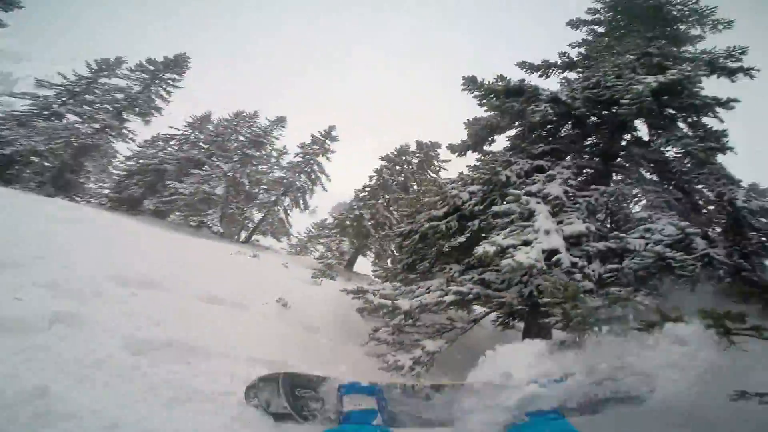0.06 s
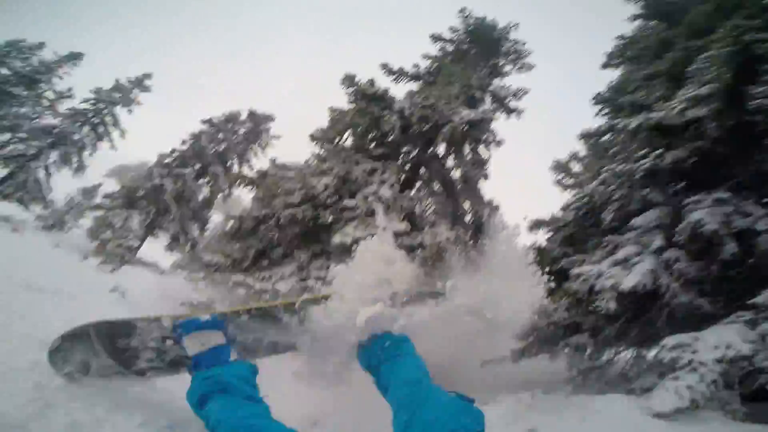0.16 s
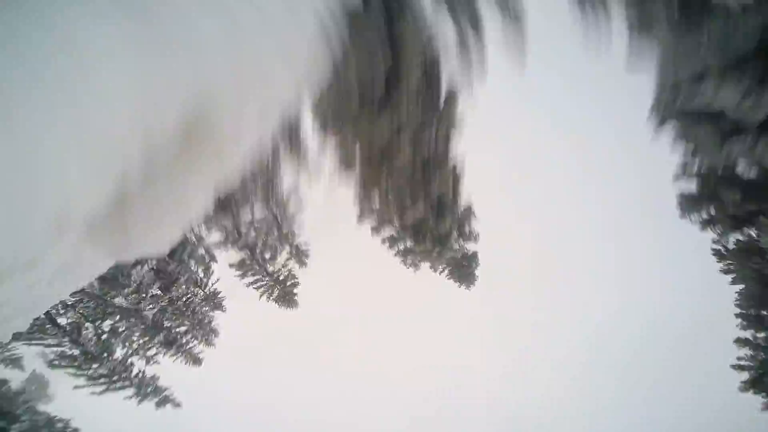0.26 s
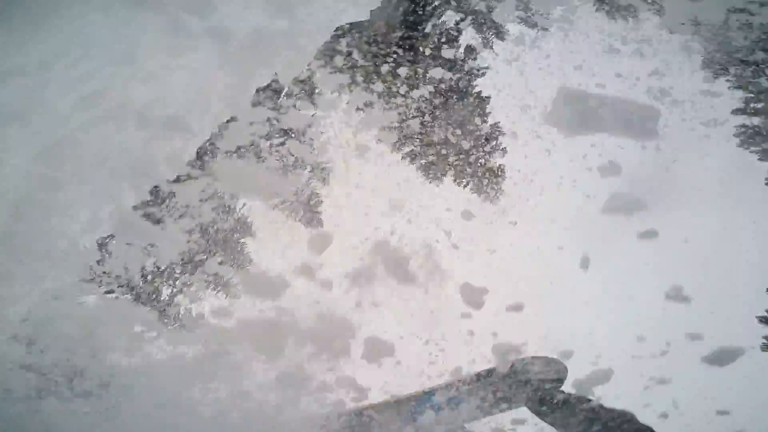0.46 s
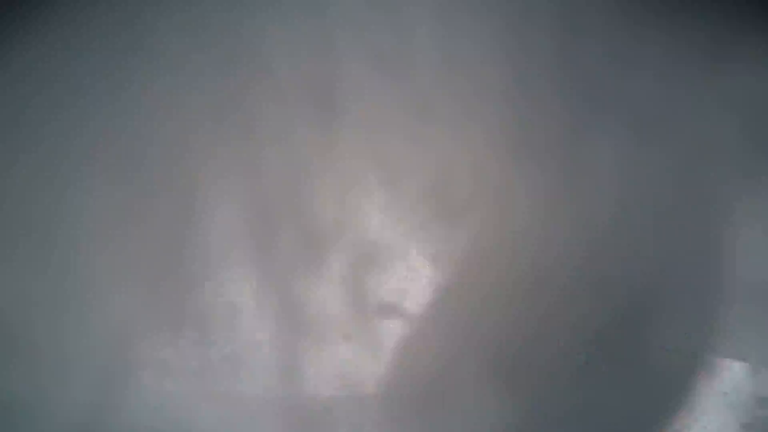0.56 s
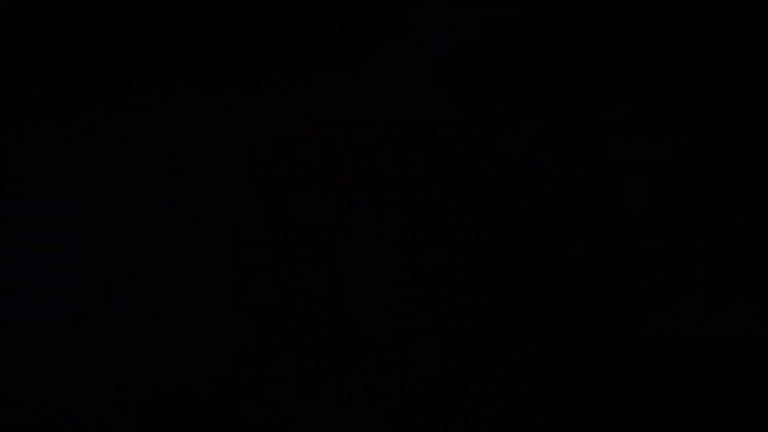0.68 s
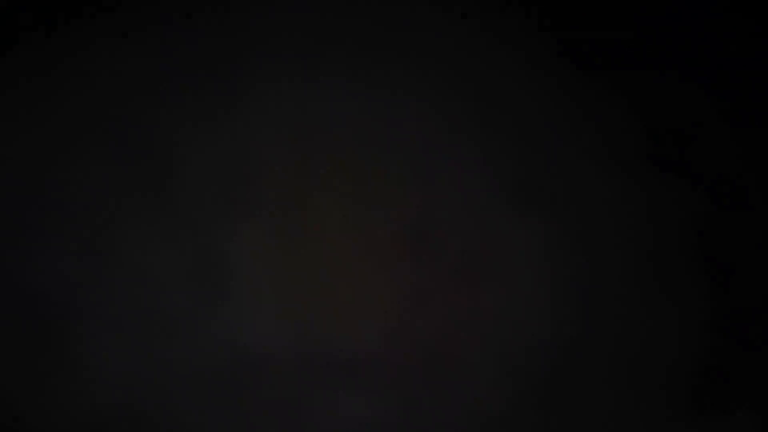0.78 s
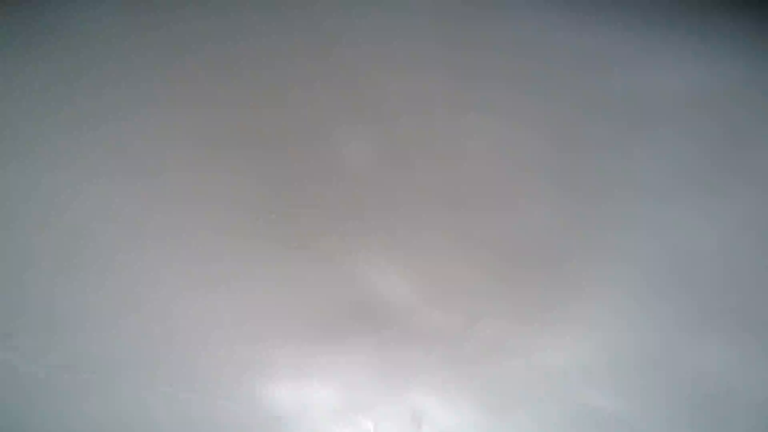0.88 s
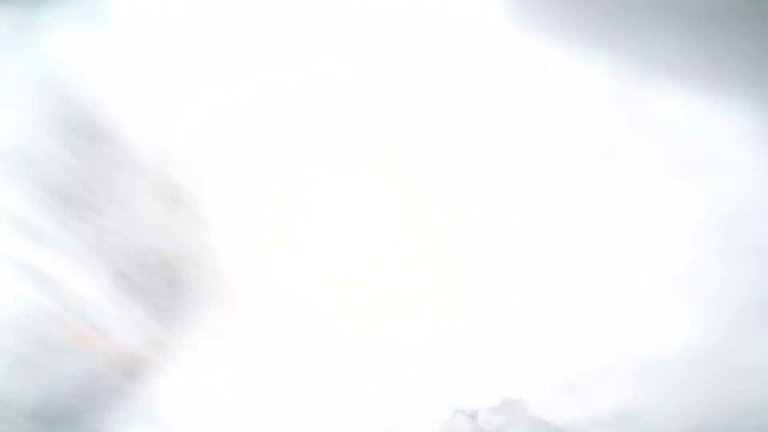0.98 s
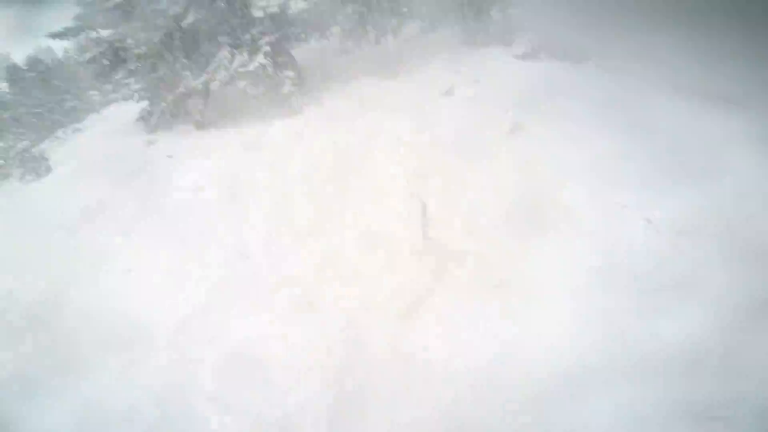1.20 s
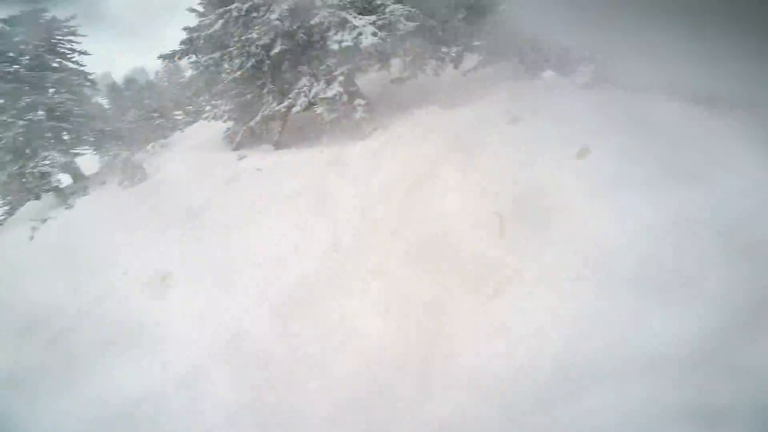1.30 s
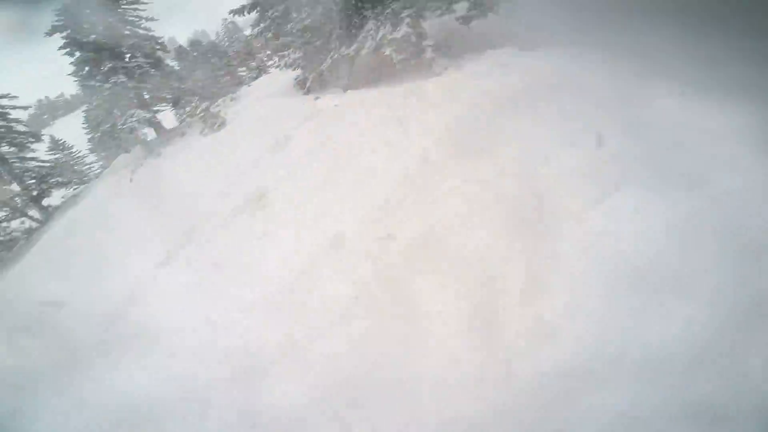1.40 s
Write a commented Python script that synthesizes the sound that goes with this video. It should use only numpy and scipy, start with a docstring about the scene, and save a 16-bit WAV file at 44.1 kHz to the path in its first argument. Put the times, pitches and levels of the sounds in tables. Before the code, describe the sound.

A snowboarder crashes through snow, heard right on a body-worn camera. Faint board hiss, ticks and low wind rumble lead to hard knocks and a thud around 0.35 seconds. From 0.5 to 0.9 seconds snow sprays, crunches and scrapes loudly over the housing, with more knocks. Near 1 second come a bump, plastic clacks and a brief low shudder, then light crackles of falling clumps fade by 1.4 seconds.

```python
"""Wind rumbles and snow flicks the plastic housing of a body-worn camera as a rider crashes in powder.
The board hisses by sliding friction, loose gear clacks, and a hard landing knocks and thuds on the shell.
Snow crunches as it fractures, sprays over the housing and scrapes along it by stick and slip.
After a last bump the mount shudders in its damped modes and a few loose clumps patter down."""
import sys
import numpy as np
from scipy.fft import rfft, irfft, next_fast_len
from scipy.io import wavfile
from scipy.ndimage import map_coordinates

SR = 44100
rng = np.random.default_rng(int(sys.argv[2]) if len(sys.argv) > 2 else 0)


def generate_wav(signal):
    """Clip the signal to [-1, 1] and save it as 16-bit WAV at the path in sys.argv[1]."""
    frames = np.transpose(np.atleast_2d(signal))
    scaled = np.clip(frames, -1, 1) * 32767
    pcm = np.round(scaled).astype(np.int16)
    wavfile.write(sys.argv[1], SR, pcm)


N = 63945


def amp(db):
    """Decibels to amplitude gain."""
    return 10 ** (np.asarray(db) / 20)


def unit(x):
    """Normalisation to rms 1."""
    return x / np.sqrt(np.mean(x ** 2) + 1e-20)


def unit_power(response):
    """Normalisation to a mean power gain of 1."""
    return response / np.sqrt(np.mean(np.abs(response) ** 2))


def clock():
    """Time of every sample in seconds."""
    return np.arange(N) / SR


def level(points):
    """Gain envelope interpolated through (s, dB) points."""
    return amp(np.interp(clock(), *np.transpose(points)))


def swell(peak_s, rise_s, fall_s):
    """Exponential growth to a peak, then exponential decay."""
    t = clock() - peak_s
    return np.exp(np.minimum(t / rise_s, -t / fall_s))


def filtered(x, response):
    """Linear filtering: the spectrum of x times a complex frequency response."""
    size = 2 * next_fast_len(N // 2 + 4096)
    hz = np.fft.rfftfreq(size, 1 / SR)
    return irfft(rfft(x, size) * response(hz), size)[:N]


def colour(points, hz, tilt_db=0, tilt_from_hz=3200):
    """Minimum-phase response of unit power through (Hz, dB) points, its treble tilted per octave."""
    point_hz, point_db = np.transpose(points)
    octave = np.log2(np.clip(hz, point_hz[0], point_hz[-1]))
    tilt = tilt_db * np.maximum(octave - np.log2(tilt_from_hz), 0)
    gain = amp(np.interp(octave, np.log2(point_hz), point_db) + tilt)
    cepstrum = irfft(np.log(gain))
    half = len(cepstrum) // 2
    cepstrum[1:half] *= 2  # folding onto positive time makes the response causal
    cepstrum[half + 1:] = 0
    return unit_power(np.exp(rfft(cepstrum)))


def resonances(modes, hz):
    """Superposition of second-order band-pass resonators given as (Hz, width Hz, dB)."""
    return sum(amp(db) * 1j * hz * width / (centre ** 2 - hz ** 2 + 1j * hz * width)
               for centre, width, db in modes)


def ringing(modes, start_s, rise_s):
    """Free vibration: damped sinusoids given as (Hz, dB, seconds to fall 60 dB)."""
    t = np.maximum(clock() - start_s, 0)
    onset = 1 - np.exp(-t / rise_s)
    return onset * sum(amp(db - 60 * t / t60) * np.sin(2 * np.pi * hz * t) for hz, db, t60 in modes)


def grains(per_s, bed_db):
    """Shot noise of snow grains on a bed of white noise, rms 1."""
    struck = rng.random(N) < per_s / SR
    impulses = unit(struck * rng.standard_normal(N))
    return unit(impulses + amp(bed_db) * rng.standard_normal(N))


def fits(per_s=450, swing_db=3.5):
    """Random amplitude modulation, rms 1, of snow that holds and gives way."""
    knots = np.clip(rng.standard_normal(int(N * per_s / SR) + 4), -1.5, 1.5)
    return unit(amp(swing_db * map_coordinates(knots, [clock() * per_s])))


def burst(peak_s, decay_s, snap_db=4):
    """A rough contact: one impulse, then decaying noise of fine crumbling."""
    snap = amp(snap_db) * (np.arange(N) == round(peak_s * SR))
    return snap + swell(peak_s, rise_s=0.00035, fall_s=decay_s) * rng.standard_normal(N)


# Strength of the wind. Each row: time in seconds, level in dB.
WIND_LEVELS = [(0, -41), (.14, -41), (.22, -32.5), (.3, -28), (.38, -19.5), (.41, -48), (.48, -37.5),
               (.55, -30), (.68, -23.5), (.83, -30), (.9, -41), (1.1, -41.5), (1.2, -50.5), (1.45, -44.5)]
# Spectrum of the wind. Each row: frequency in Hz, relative level in dB.
WIND_SPECTRUM = [(15, -9), (35, 0), (60, 1), (100, -13.5), (170, -22), (300, -36.5), (800, -37),
                 (3000, -110)]


def wind():
    """Turbulence: pressure fluctuations buffet the housing with a low rumble."""
    rumble = filtered(rng.standard_normal(N), lambda hz: colour(WIND_SPECTRUM, hz))
    return level(WIND_LEVELS) * unit(rumble)


# Strength of the housing's scrape through snow. Each row: time in seconds, level in dB.
PLOUGH_LEVELS = [(0, -58.5), (.21, -75), (.24, -41), (.29, -53), (.41, -82), (.465, -74), (.495, -44),
                 (.6, -32.5), (.7, -33), (.755, -36.5), (.785, -32), (.805, -25.5), (.823, -32),
                 (.838, -16), (.875, -20), (.905, -23), (.935, -48), (1.05, -65), (1.45, -78)]
# Spectrum of packed snow. Each row: frequency in Hz, relative level in dB.
PACKED_SPECTRUM = [(60, -5), (200, 0.5), (400, 0.5), (600, -3.5), (1000, -11.5), (1800, -15), (4000, -25),
                   (8000, -38), (15000, -39.5)]


def plough():
    """Stick-slip friction: packed snow catches and releases on the housing in a dull, coarse scrape."""
    slips = level(PLOUGH_LEVELS) * grains(per_s=1500, bed_db=-9.5)
    return filtered(slips, lambda hz: colour(PACKED_SPECTRUM, hz))


# Modes of the plastic shell. Each row: frequency in Hz, bandwidth in Hz, gain in dB.
HOUSING_MODES = [(1632, 120, 6.5), (2400, 280, -9), (3306, 108, 2.5), (7440, 79, -4)]


def housing(hz, coupling_db=0):
    """Resonance: the shell adds a few narrow bands to the sound passing through it."""
    return 1 + amp(coupling_db) * resonances(HOUSING_MODES, hz)


# Strength of the board's hiss. Each row: time in seconds, level in dB.
SLIDE_LEVELS = [(0, -62.5), (.19, -56), (.235, -53.5), (.33, -47), (.365, -56), (.4, -77.5), (.452, -71),
                (.46, -66), (.482, -41), (.55, -39.5), (.6, -31), (.645, -29), (.67, -56.5), (.9, -33),
                (.94, -62), (1.0, -58), (1.06, -62), (1.2, -44.5), (1.3, -59.5), (1.45, -58)]
# Spectrum of that hiss. Each row: frequency in Hz, relative level in dB.
SLIDE_SPECTRUM = [(300, -19), (1100, -17.5), (1600, -6), (2300, -1.5), (4300, -10), (6500, -14.5),
                  (9000, -23.5), (15000, -30)]


def slide():
    """Sliding friction: the board on snow makes a smooth hiss, heard through the shell."""
    hiss = level(SLIDE_LEVELS) * rng.standard_normal(N)
    return filtered(hiss, lambda hz: colour(SLIDE_SPECTRUM, hz) * housing(hz))


# Snow clumps striking the shell. Each row: time in seconds, level in dB, decay in seconds,
# treble tilt in dB per octave.
CLUMP_HITS = [(0.0897, -34.5, 0.0024, -4), (0.1059, -37.5, 0.0035, 0), (0.1758, -38.5, 0.00055, 7),
              (0.2229, -23, 0.0019, -3), (.2815, -36, 0.0014, -1), (.324, -25, 0.0013, 0),
              (0.339, -13, 0.0015, -6.5), (0.3591, -10, 0.00081, -8.5), (0.371, -42, 0.0031, 5),
              (.388, -28.5, 0.00073, 3), (0.5698, -9.5, 0.0012, -1), (0.574, -26, 0.00057, 6),
              (0.58, -19, 0.0021, 3.5), (0.6078, -10.5, 0.0027, 6.5), (0.7929, -17, 0.00034, -2.5),
              (0.796, -16, 0.00037, 2), (0.811, -11, 0.00069, -0.5), (.839, -13.5, 0.00067, -2),
              (1.245, -22, 0.0021, 4), (1.27, -31.5, 0.0012, -1), (1.28, -35.5, 0.00096, 5),
              (1.302, -38.5, 0.00084, 4), (1.318, -39, 0.00088, 8), (1.3312, -32, 0.00077, 1.5),
              (1.34, -42, 0.00079, 2), (1.3481, -43, .0007, 14), (1.361, -36.5, 0.0012, 4),
              (1.369, -34.5, 0.00051, 0.5)]
# Spectrum of a brief contact. Each row: frequency in Hz, relative level in dB.
CONTACT_SPECTRUM = [(200, -8.5), (1050, -15), (1600, -3), (2500, -2), (4200, -4.5), (7300, -8),
                    (11000, -19.5), (15000, -25)]


def clumps():
    """Inelastic impact: each clump bursts on the shell with its own brightness."""
    hits = sum(filtered(amp(db) * burst(s, decay), lambda hz: colour(CONTACT_SPECTRUM, hz, tilt_db))
               for s, db, decay, tilt_db in CLUMP_HITS)
    return filtered(hits, lambda hz: housing(hz, coupling_db=-8))


# Loose plastic gear colliding. Each row: time in seconds, level in dB, decay in seconds, pitch ratio.
GEAR_HITS = [(0.2216, -23, 0.0034, 1.11), (0.2635, -30.5, 0.0019, 1.04), (1.0104, -17.5, 0.0022, 1.03),
             (1.0151, -17, 0.0033, 0.96), (1.037, -28.5, 0.0024, 1.12), (1.057, -24, 0.0019, 0.81),
             (1.075, -30, 0.0032, 1.05), (1.0984, -11.5, 0.001, 0.97), (1.118, -26.5, 0.0013, 0.94)]
# Modes of the gear. Each row: frequency in Hz, bandwidth in Hz, relative gain in dB.
GEAR_MODES = [(1705, 400, 0.5), (2150, 280, 3), (2440, 180, 2), (3560, 170, -13)]


def clacks():
    """Impact excitation: rough contacts ring the gear, higher or lower with the spot that is struck."""
    def ring(hz, pitch):
        return unit_power(resonances(GEAR_MODES, hz / pitch) * colour(CONTACT_SPECTRUM, hz))
    return sum(filtered(amp(db) * burst(s, decay), lambda hz: ring(hz, pitch))
               for s, db, decay, pitch in GEAR_HITS)


def leaky(pressure, corner_hz):
    """First-order high-pass: pressure on the microphone leaks away and swings back."""
    return filtered(pressure, lambda hz: 1j * hz / (corner_hz + 1j * hz))


# Soft pushes on the microphone. Each row: peak time in seconds, level in dB, half width in seconds.
SHOVE_PULSES = [(0.241, -8, 0.0041), (0.263, -12, 0.0043), (0.315, -13, 0.0034), (0.375, -12.5, 0.0017),
                (0.654, -3, 0.0026), (0.673, -9.5, 0.0022), (.966, -8, 0.0072)]


def shoves():
    """Slow compression: air and snow press on the microphone in Gaussian pulses."""
    pressure = sum(amp(db) * np.exp(-((clock() - s) / width) ** 2) for s, db, width in SHOVE_PULSES)
    return leaky(pressure, corner_hz=12.6)


# Hard blows on the housing. Each row: start in seconds, level in dB, rise time in seconds.
KNOCK_PULSES = [(0.3051, -4.5, 0.00063), (.34, -1, 0.00098), (.343, 4, 0.0003), (0.3476, 1.5, 0.00088),
                (0.353, -4, 0.00046), (0.7023, -0.5, 0.00052), (.801, -2, 0.00031), (.81, -2.5, 0.00057),
                (0.8268, -1.5, 0.00048), (0.8303, -4.5, 0.00032)]


def knocks():
    """Impulsive loading: each blow is one short push of pressure with no ring."""
    pressure = np.zeros(N)
    for start, db, rise in KNOCK_PULSES:
        age = np.maximum(clock() - start, 0) / rise
        pressure += amp(db) * (age * np.exp(1 - age)) ** 2
    return leaky(pressure, corner_hz=67.6)


# Modes of the landing thud. Each row: frequency in Hz, level in dB, seconds to fall 60 dB.
THUD_MODES = [(75, 1.4, 0.066), (184.6, 0.55, 0.044)]


def thud():
    """Heavy damping: the landing excites low, hollow modes of the camera that die quickly."""
    return ringing(THUD_MODES, start_s=0.3405, rise_s=0.0017)


# Snow collapsing under the housing. Each row: peak time in seconds, level in dB, rise in seconds,
# fall in seconds, level of the dull body relative to the crisp grains in dB.
COLLAPSES = [(0.353, -22.5, 0.005, 0.0025, 11.5), (0.427, -57.5, 0.0012, 0.0091, 18),
             (0.652, -21, 0.0035, 0.00059, 3.5), (0.663, -17, 0.001, 0.0026, 5.5),
             (0.672, -15, 0.0023, 0.004, -10.5), (0.69, -16.5, 0.0025, 0.0048, -3),
             (.7, -15.5, 0.0056, 0.0061, -2), (0.7237, -19, 0.0029, 0.003, 6.5),
             (0.7412, -17.5, 0.0073, 0.0021, 6.5), (0.761, -21, 0.00081, 0.0061, 0),
             (0.7675, -20.5, 0.0032, 0.0021, 8.5), (0.8125, -20.5, 0.0017, 0.0036, 14),
             (0.966, -16.5, 0.0053, 0.0036, -2), (1.014, -23.5, 0.0046, 0.0051, -10)]
# Spectrum of the crisp grains. Each row: frequency in Hz, relative level in dB.
CRISP_SPECTRUM = [(200, 0), (900, -2.5), (1500, 3), (2600, -2), (4500, -6.5), (7500, -9.5), (11000, -15),
                  (15000, -25)]


def crunches():
    """Brittle fracture: snow under growing load lets go in fits, bright grains over a duller body."""
    crisp_gain = sum(amp(db) * swell(s, rise, fall) for s, db, rise, fall, _ in COLLAPSES)
    body_gain = sum(amp(db + body_db) * swell(s, rise, fall) for s, db, rise, fall, body_db in COLLAPSES)
    breaking = fits()
    crisp = breaking * crisp_gain * grains(per_s=3000, bed_db=1.5)
    body = breaking * body_gain * grains(per_s=3000, bed_db=2.0)
    return (filtered(crisp, lambda hz: colour(CRISP_SPECTRUM, hz))
            + filtered(body, lambda hz: colour(PACKED_SPECTRUM, hz)))


# Strength of the powder spray. Each row: time in seconds, level in dB.
SPRAY_LEVELS = [(.44, -93), (.465, -46.5), (.56, -64), (.612, -42), (.626, -21), (.652, -21), (.657, -39),
                (.745, -29.5), (.755, -46.5), (.87, -32.5), (.94, -74), (1.06, -44), (1.22, -40.5),
                (1.28, -63), (1.4, -84)]
# Spectrum of the spray. Each row: frequency in Hz, relative level in dB.
SPRAY_SPECTRUM = [(300, -16.5), (1100, -13.5), (1600, -0.5), (2500, -2), (4300, -1), (7800, -3.5),
                  (10000, -7.5), (15000, -14.5)]


def spray():
    """Shot noise: dense impacts of fine snow on the shell merge into uneven flurries of hiss."""
    stream = level(SPRAY_LEVELS) * fits() * grains(per_s=10000, bed_db=-4)
    return filtered(stream, lambda hz: colour(SPRAY_SPECTRUM, hz) * housing(hz))


def rasp(centre_hz=1680, width_hz=140, level_db=-23):
    """Forced resonance: crusted snow scrapes ever harder and sets one narrow band of the shell singing."""
    band = filtered(rng.standard_normal(N), lambda hz: resonances([(centre_hz, width_hz, 0)], hz))
    return amp(level_db) * swell(peak_s=0.62, rise_s=0.03, fall_s=0.01) * unit(band)


# Modes of the camera mount. Each row: frequency in Hz, level in dB, seconds to fall 60 dB.
MOUNT_MODES = [(56.1, -18.5, 0.35), (132.2, -26, 0.48)]


def shudder():
    """Elastic recoil: the mount springs free of the snow and vibrates in two lightly damped modes."""
    return ringing(MOUNT_MODES, start_s=1.015, rise_s=0.041)


def scene():
    """Free-field superposition: all sources add at one microphone, and open snow gives no echo."""
    impacts = clumps() + clacks() + shoves() + knocks() + thud()
    snow = crunches() + slide() + rasp() + spray() + plough()
    return (impacts + snow + wind() + shudder())[None]


def record(dry, knee=9, top_hz=15250):
    """Saturation and band limiting: the camera rounds off peaks at full scale and cuts the top treble."""
    saturated = dry[0] / (1 + np.abs(dry[0]) ** knee) ** (1 / knee)
    return filtered(saturated, lambda hz: 1 / (1 + (hz / top_hz) ** 120))[None]


dry = scene()
out = record(dry)
generate_wav(out)
```